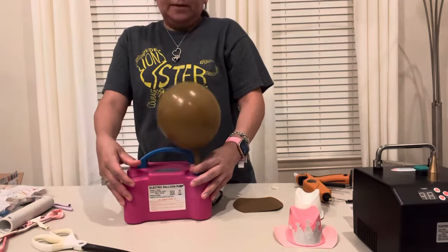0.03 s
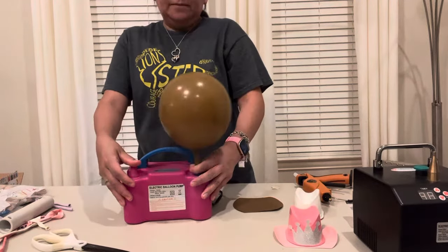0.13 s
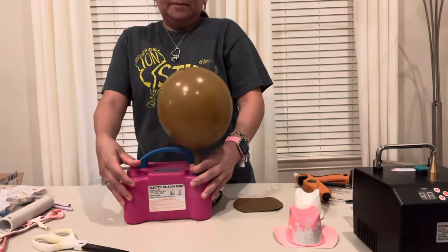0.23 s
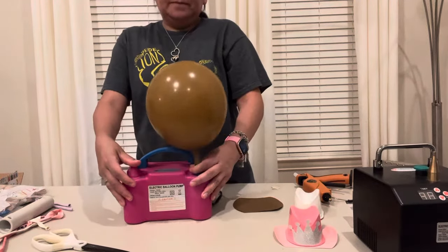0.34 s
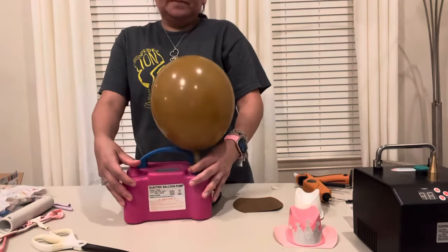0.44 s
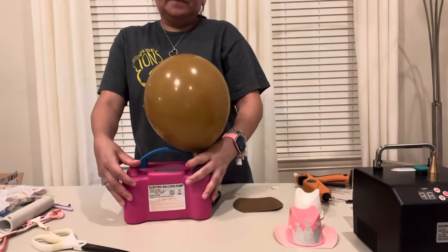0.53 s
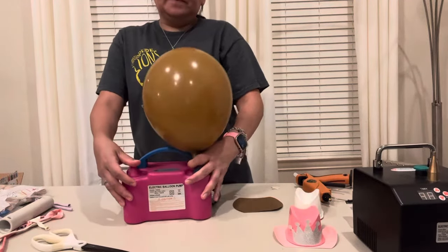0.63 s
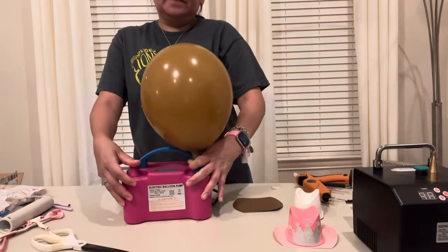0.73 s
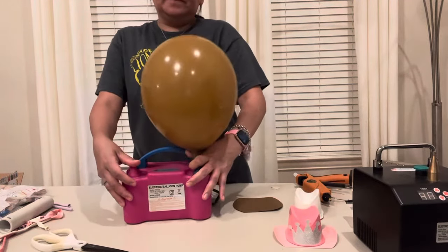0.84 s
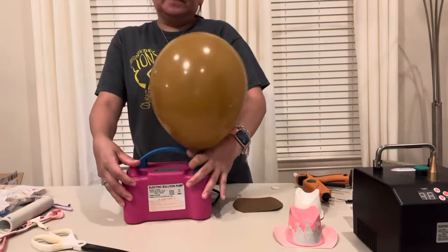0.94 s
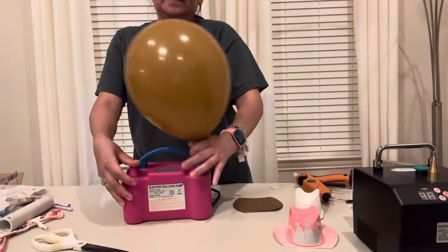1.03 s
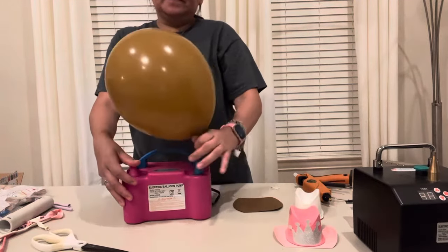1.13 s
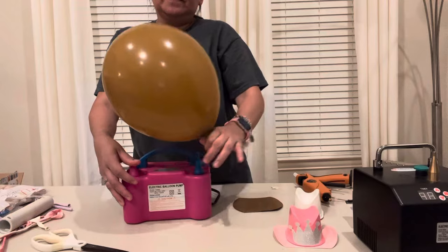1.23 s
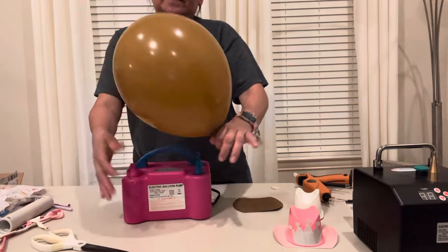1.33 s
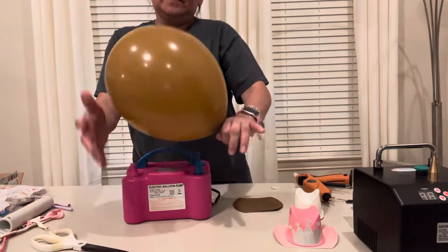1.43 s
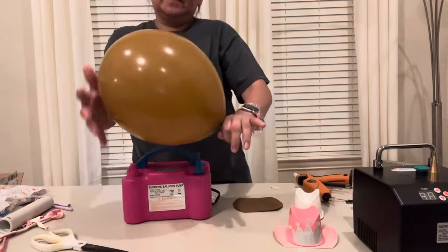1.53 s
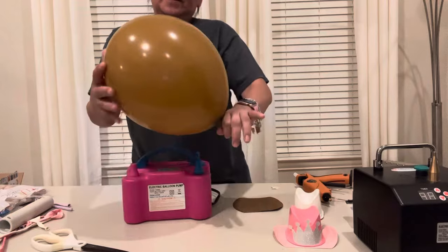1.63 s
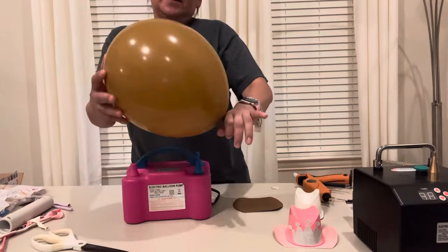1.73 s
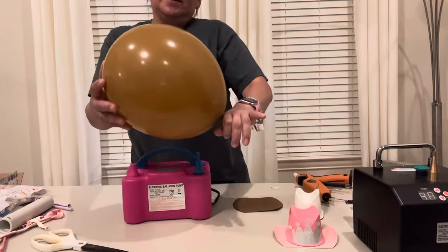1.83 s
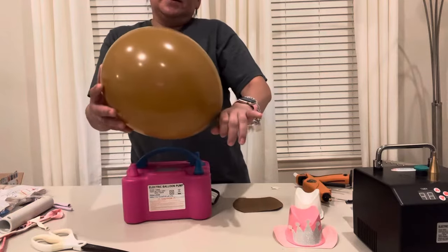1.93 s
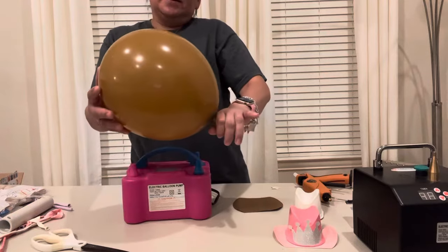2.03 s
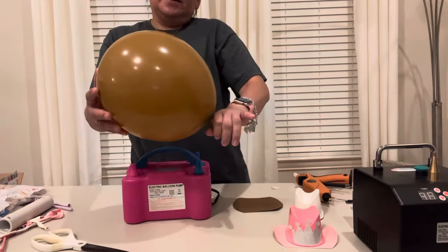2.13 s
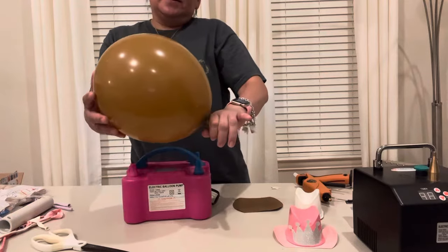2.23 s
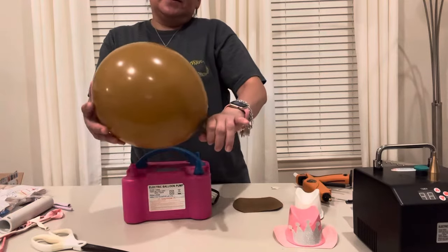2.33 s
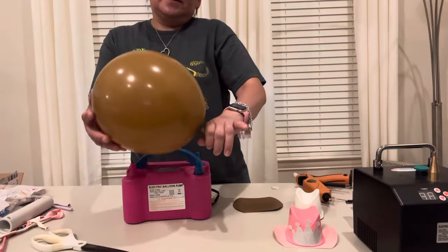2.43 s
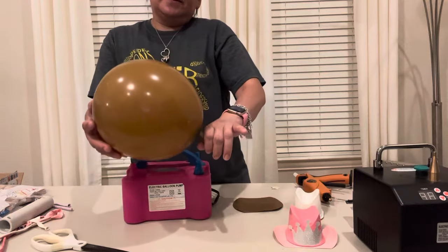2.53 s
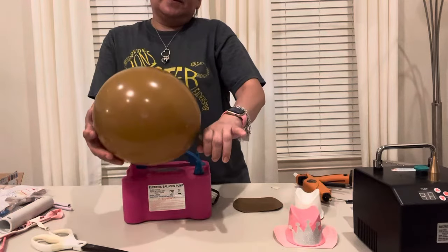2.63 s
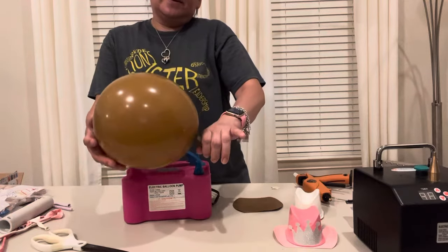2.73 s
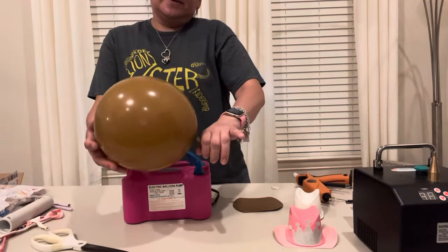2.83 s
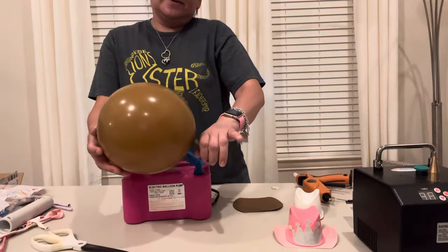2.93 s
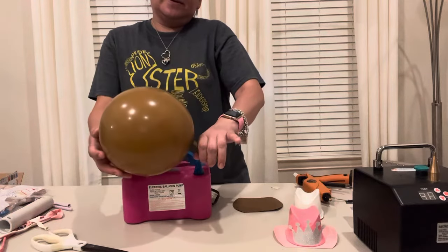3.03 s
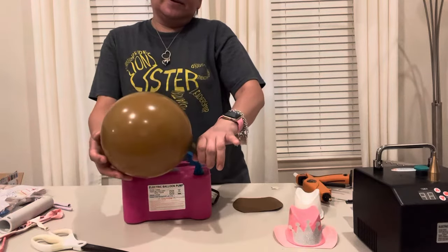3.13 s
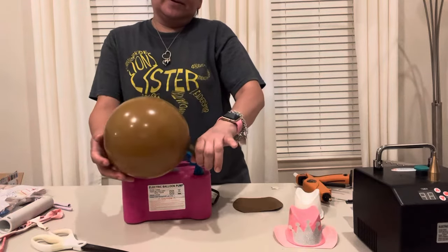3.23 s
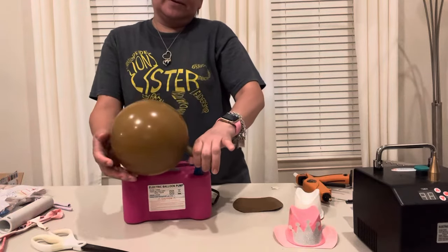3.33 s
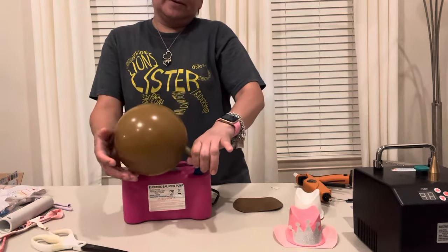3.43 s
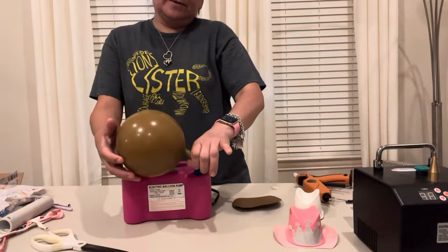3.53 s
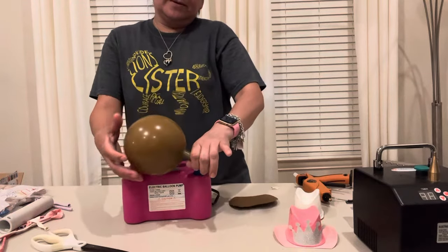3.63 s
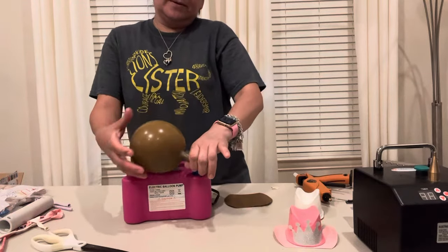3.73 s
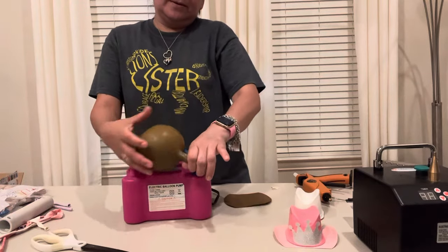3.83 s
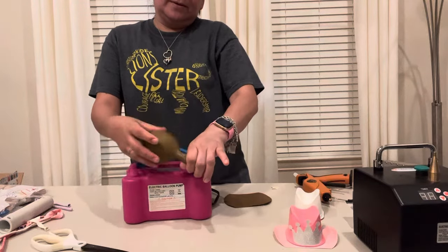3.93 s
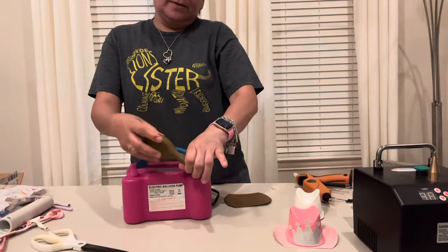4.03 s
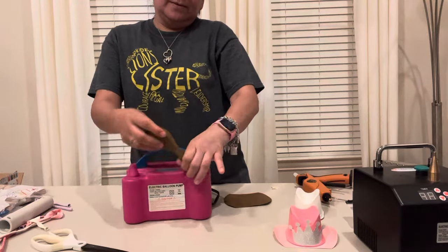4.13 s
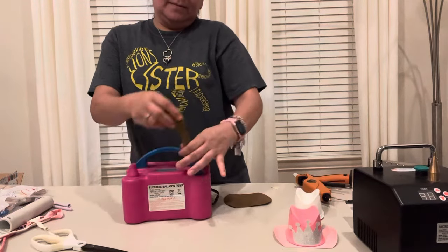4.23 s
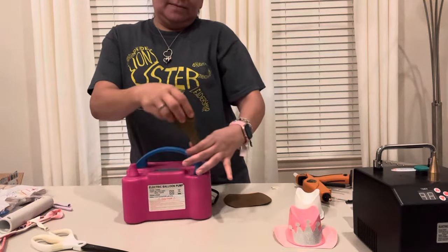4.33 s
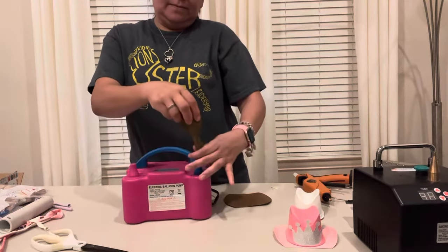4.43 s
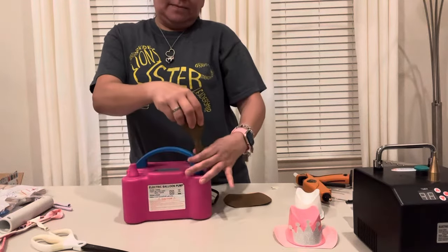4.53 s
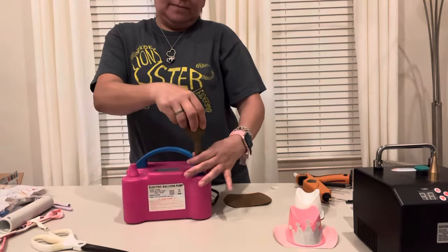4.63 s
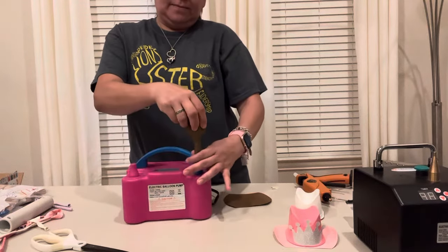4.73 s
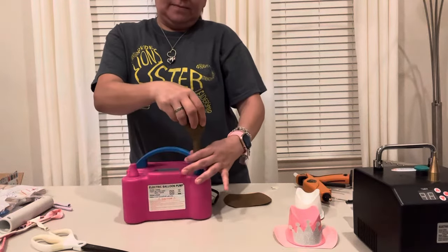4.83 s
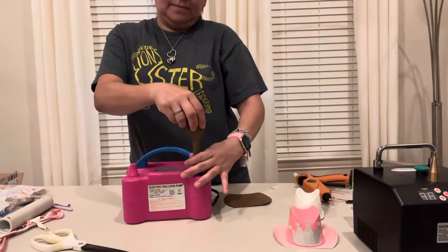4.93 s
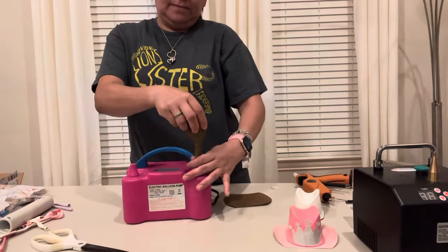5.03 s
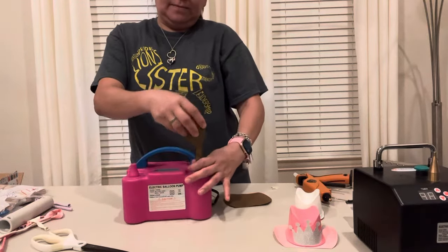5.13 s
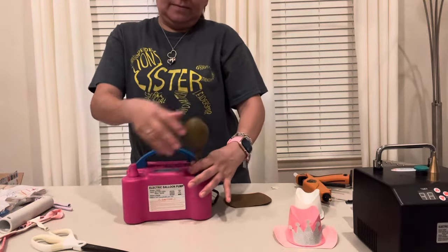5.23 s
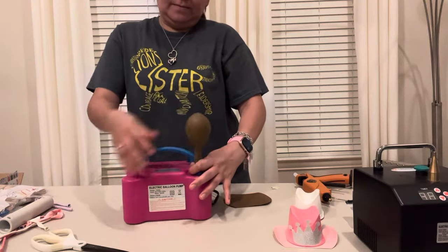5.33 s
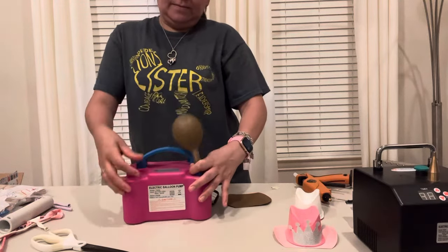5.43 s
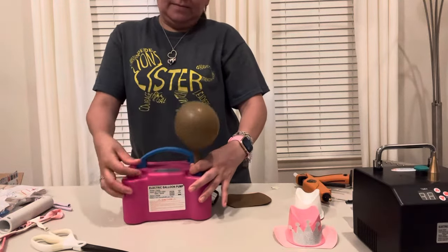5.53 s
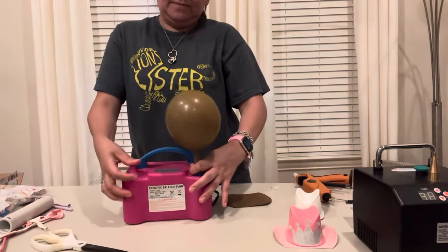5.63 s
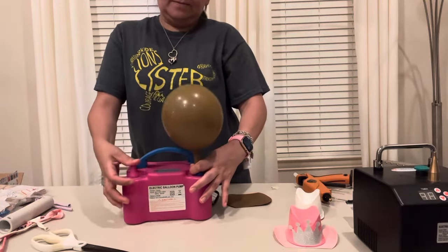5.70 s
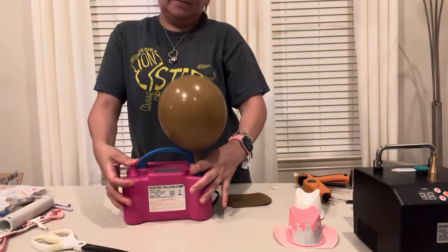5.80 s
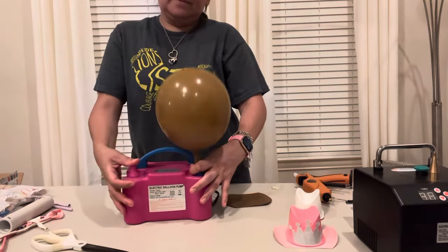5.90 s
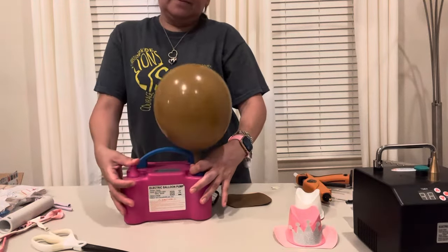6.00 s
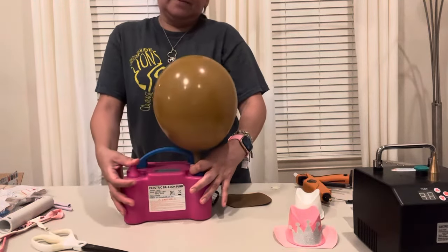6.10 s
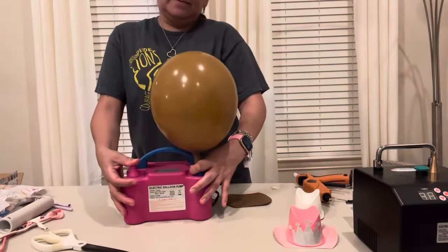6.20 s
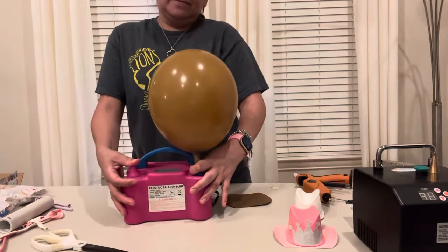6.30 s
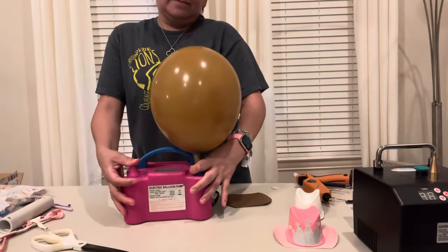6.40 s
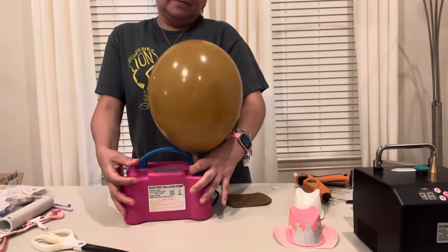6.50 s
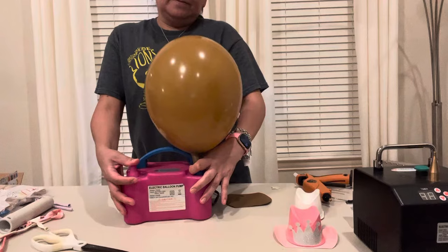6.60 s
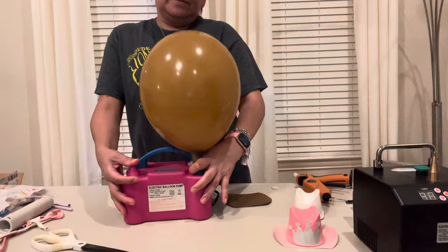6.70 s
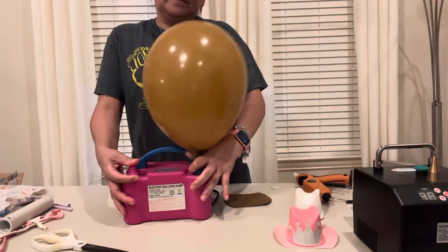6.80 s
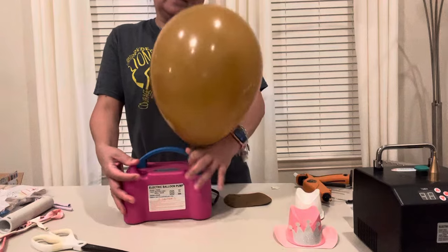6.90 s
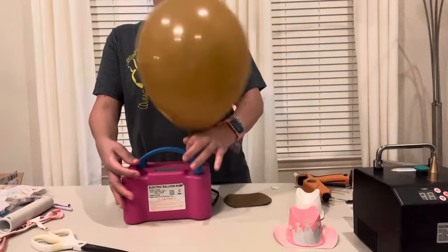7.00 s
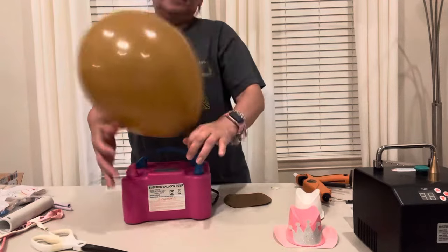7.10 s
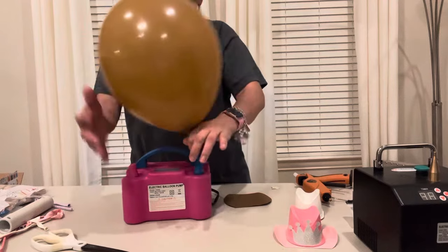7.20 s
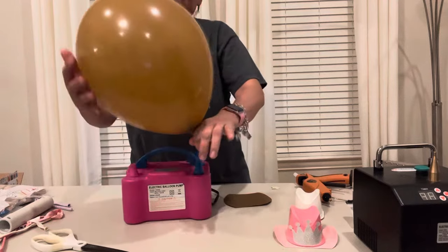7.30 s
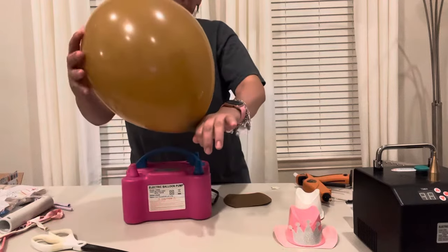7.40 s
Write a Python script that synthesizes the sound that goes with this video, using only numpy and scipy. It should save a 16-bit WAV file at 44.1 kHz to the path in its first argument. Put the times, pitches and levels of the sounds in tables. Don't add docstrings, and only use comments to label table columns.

```python
import sys
import numpy as np
from scipy import signal
from scipy.fft import rfft, irfft, next_fast_len
from scipy.io import wavfile
from scipy.ndimage import uniform_filter1d

SR = 44100
rng = np.random.default_rng(int(sys.argv[2]) if len(sys.argv) > 2 else 0)


def field_ratio(decibels):
    return 10 ** (np.asarray(decibels, dtype=float) / 20)


def transcribe(u):
    v = np.clip(np.atleast_2d(u).T, -1, 1)
    q = np.round(v * 32767).astype(np.int16)
    wavfile.write(sys.argv[1], SR, q)


N = 328839
T = np.arange(N) / SR
SIZE = next_fast_len(N + SR)
HZ = np.maximum(np.arange(SIZE // 2 + 1) * SR / SIZE, 1)

# on in seconds, off in seconds.
POWERED = [(-1, .405), (5.1546, 6.8174)]
# time in seconds, flow in dB, back pressure in dB (thickens the low part).
BLOWER_FLOW = [
    [(0, -25, 3), (.1, -22, 1), (.39, -19.5, -1), (.48, -22, 0), (.66, -28, -2), (.846, -40, 2),
     (.974, -41, 2), (.985, -30, -5)],
    [(5.172, -60, -4), (5.2, -50, -2), (5.33, -38, 1), (5.432, -25.5, -3), (5.494, -38, 4)],
    [(5.494, -38, 4), (5.6, -26, 4), (5.77, -20.5, 0), (6.1, -20.5, -2), (6.22, -24, -4), (6.42, -22, -6),
     (6.57, -25, -5), (6.84, -32, 0), (6.885, -28, -3)],
]
# frequency in Hz, sum over difference in dB.
PORTS = [(40, 21), (125, 16), (300, 11), (600, 5.5), (1500, 4.5), (4500, 3.5), (6000, -1.5), (8600, -1.5),
         (9300, -13.5), (10000, -37), (13000, -33.5), (14000, -1.5), (15800, -1.5)]
# centre in Hz, width in Hz, gain in dB.
NECK_PEAKS = [(4210, 410, 6.2), (4620, 98, 4.4), (1960, 67, 2.6), (3150, 560, 2.4)]
# centre in Hz, width in Hz, gain in dB.
MOUTH_PEAKS = [(1340, 120, 7), (1980, 300, 16)]


def rms_one(x):
    return x / np.sqrt(np.mean(x ** 2) + 1e-20)


def in_time(rows):
    s, *columns = np.transpose(rows)
    gate = np.clip(np.minimum(T - s[0], s[-1] - T) / .005 + 1, 0, 1)
    return [gate] + [np.interp(T, s, c) for c in columns]


def joined(spans):
    gate = np.max([in_time(rows)[0] for rows in spans], axis=0)
    return [gate] + in_time(sum(spans, []))[1:]


def between(start, end):
    return np.clip(np.minimum(T - start, end - T) * 1000 + .5, 0, 1)


def at_hz(points):
    hz, level_db = np.transpose(points)
    return field_ratio(np.interp(np.log(HZ), np.log(hz), level_db))


def bumps(hz, peaks):
    return sum(gain_db / (1 + (2 * (hz - centre) / width) ** 2) for centre, width, gain_db in peaks)


def drift(rate):
    knots = rng.standard_normal(4000)
    return np.interp(T * np.clip(rate, .1, 500), np.arange(4000), knots) * 1.2


def cycles(hz):
    return 2 * np.pi * np.cumsum(hz) / SR


def tone(phase, level_db):
    return np.sqrt(2) * field_ratio(level_db) * np.sin(phase)


def riding_band(hz, width_hz):
    phase = cycles(hz)
    return drift(width_hz) * np.sin(phase) + drift(width_hz) * np.cos(phase)


def air(flow, parts, colour, peaks, patchy_db):
    mid, own = rfft(rng.standard_normal((2, SIZE)))
    linked = .49
    side = -1j * linked * mid + np.sqrt(1 - linked ** 2) * own
    bounces = rms_one(rng.standard_normal(3000) * field_ratio(-T[:3000] * 600))
    echoes = np.abs(1 + .45 * rfft(bounces, SIZE) / np.sqrt(3000))
    shape = at_hz(colour) * echoes * field_ratio(bumps(HZ, peaks))
    noise = shape * np.array([mid * at_hz(PORTS), side])

    centres = np.log([350, 1000, 1800, 2800, 4400, 6500, 8500])
    shared = drift(12)
    bands = []
    for hat in np.eye(7):
        band = irfft(noise * np.interp(np.log(HZ), centres, hat), SIZE)[:, :N]
        bands.append(band * field_ratio(patchy_db * (drift(16) + .65 * shared)))

    power = np.abs(noise[0]) ** 2 * 2 / SIZE ** 2
    layers = []
    for a, b, low, high in [(0, 2, 800, 1300), (2, 4, 1500, 3500), (4, 5, 3500, 5600), (5, 7, 5600, 9000)]:
        rms = np.sqrt(np.sum(power[(HZ > low) & (HZ < high)]))
        layers.append(sum(bands[a:b]) / rms)
    rumble, body, hiss, top = layers

    gate, flow_db, pressure_db = flow
    out = field_ratio(flow_db) * hiss
    for layer, (db, follows, thickens) in zip([rumble, body, top], parts):
        out = out + field_ratio(db - 30 + follows * (flow_db + 30) + thickens * pressure_db) * layer
    return gate * out


def motion():
    pulled_off = (.99, 6.885)
    powered = sum(between(*span) for span in POWERED)
    capped = between(-1, pulled_off[0]) + between(POWERED[1][0], pulled_off[1])
    friction, capped_drag, open_drag, stall_pull = 51.19, 340.2, 546.5, 2997
    drags = open_drag + capped * (capped_drag - open_drag)
    step = 40
    speed = [660]
    for on, drag in zip(powered[::step], drags[::step]):
        now = max(speed[-1], 1)
        pull = on * stall_pull / (1 + (now / 419.1) ** 3.342)
        speed.append(now + step / SR * (pull - friction - drag * (now / 700) ** 2.123))
    return powered, capped, np.interp(np.arange(N) / step, np.arange(len(speed)), speed)


def quiet_air(speed):
    # frequency in Hz, level in dB per Hz.
    quiet_colour = [(24, -60), (40, -22), (179, -20.5), (261, -6.5), (335, -10.5), (389, -12.5), (765, -1),
                    (1540, -20), (3980, -23), (4740, -16), (15800, -27)]
    # dB over the hiss, share of the flow's swing, share of the back pressure.
    quiet_parts = [(6, 1.0, 0), (-1, 1.0, 0), (1, 1.0, 0)]
    whisper_db = -69 + 10.5 * np.log2(np.minimum(speed / 100, 1))
    return air((1, whisper_db, 0), quiet_parts, quiet_colour, NECK_PEAKS, patchy_db=.6)


def current(speed):
    # centre in Hz, width in Hz, gain in dB.
    bar_peaks = [(3740, 600, 22), (2100, 250, 9), (4700, 1300, 12), (6200, 900, 12)]
    mains = cycles(np.full(N, 121))
    on, off = POWERED[1]
    age = np.maximum(T - on - .012, 0)
    inrush = field_ratio(-27 - 60 * age / .6)
    running = field_ratio(-42 - 60 * age / 2.8)
    hum = np.minimum(age / .045, 1) ** 2 * (inrush + running)

    throb = 1 + .75 * np.cos(mains + .96)
    bars_hz = 11.8 * speed
    whine = 0
    for k, level_db in [(1, -43.5), (2, -54)]:
        whine = whine + tone(k * cycles(bars_hz), level_db + bumps(k * bars_hz, bar_peaks) - 20 * age)
    whine_gate = np.clip((age - .01) / .02, 0, 1) * np.clip((.21 - age) / .09, 0, 1)
    return between(on, off) * tone(mains, 0) * hum + whine_gate * throb * whine


def brushes(speed):
    # multiple of the speed, level in dB, loudest moment in seconds.
    brush_orders = [(45.7, -79, 4.75), (72.6, -71, 4.62), (96, -76, 4.75), (120, -79, 4.98)]
    phase = cycles(np.minimum(speed, 150) * (1 + .003 * drift(60)))
    chatter = 0
    for order, level_db, s in brush_orders:
        chatter = chatter + tone(order * phase, level_db - 130 * (T - s) ** 2 + 3.5 * drift(25))
    return between(3, POWERED[1][0]) * chatter


def unbalance(phase, powered, speed):
    # frequency in Hz, level in dB.
    casing = [(50, -68), (126, -69), (138, -45), (200, -37), (300, -44), (390, -30), (540, -28), (720, -24)]
    # centre in Hz, width in Hz, gain in dB.
    casing_peaks = [(91, 12, 14), (166, 10, -11), (250, 16, -3), (345, 24, -16), (290, 30, -4),
                    (692, 12, -6)]
    # centre in Hz, width in Hz, gain
    # in dB.
    room_nulls = [(375, 9, -11), (400, 8, -20), (472, 11, -12), (518, 14, -10), (571, 14, -16),
                  (616, 14, -14), (595, 14, 6), (540, 14, 5), (717, 16, -3.5), (352, 14, -13)]
    # centre in Hz, width in Hz, gain in dB.
    driven_peaks = [(652, 30, 12), (677, 9, 7), (606, 24, 9), (520, 180, 8), (240, 200, -14)]
    driven = uniform_filter1d(powered, size=2000)
    hz, level_db = np.transpose(casing)
    first_db = np.interp(np.log(speed), np.log(hz), level_db) + bumps(speed, casing_peaks + room_nulls)
    first_db = first_db + driven * bumps(speed, driven_peaks)
    load = driven / (1 + np.exp((675 - speed) / 15)) * field_ratio(-6 * np.clip((speed - 690) / 25, 0, 1))
    out = tone(phase, first_db + 1.5 * drift(14) + drift(30))
    # overtone, dB against the first tone when idle, dB at full load
    for order, idle_db, loaded_db in [(2, -25, -34), (3, -32, -38)]:
        level = field_ratio(first_db + idle_db) * (1 - driven) + load * field_ratio(loaded_db)
        out = out + tone(order * phase, 3 * drift(6)) * level
    return out


def blades(phase, capped, speed):
    level_db = -59 + 40 * np.log10(speed / 470) + bumps(7 * speed, [(3200, 240, 20)])
    return (1 - capped) * tone(7 * phase, level_db + 3 * drift(20))


def rotor(powered, capped, speed):
    phase = cycles(speed * (1 + .0017 * drift(40)))
    return unbalance(phase, powered, speed) + blades(phase, capped, speed) + brushes(speed)


def blower_air():
    # frequency in Hz, level in dB per Hz.
    blower_colour = [(24, -83.5), (50, -49), (595, -13), (692, -8), (765, -10), (1260, -20), (1390, -17.5),
                     (1500, -21), (2540, -17), (2880, -8.5), (3180, -12.5), (3790, -11), (6240, -12),
                     (8640, -13), (15800, -25)]
    # centre in Hz, width in Hz, gain in dB.
    blower_peaks = [(2850, 300, -9), (4234, 1200, 1.5), (1020, 240, 3), (5000, 300, -4), (3550, 300, -3),
                    (2300, 500, 3)]
    # dB over the hiss, share of the flow's swing, share of the back pressure.
    blower_parts = [(-4.5, .3, .6), (1, .8, 1.1), (-2.5, .75, .1)]
    return air(joined(BLOWER_FLOW), blower_parts, blower_colour, blower_peaks, patchy_db=1.4)


def swirl(speed):
    # time in seconds, pitch in Hz, dB against the hiss.
    mouth_ring = [
        [(0.02, 4060, -3), (0.258, 3920, -1.5), (0.318, 4310, -1.5), (0.61, 4120, -3), (0.8, 4200, -6)],
        [(5.55, 4350, -6), (5.66, 4300, -1.5), (5.76, 4000, 1.5), (5.92, 3800, -1.5), (5.99, 4300, -1.5),
         (6.14, 4200, 1.5), (6.3, 4420, -.5), (6.55, 4350, -.5), (6.85, 4400, -7)],
    ]
    gate, flow_db, pressure_db = joined(BLOWER_FLOW)
    eddies = riding_band(4.2 * speed, 400) * field_ratio(pressure_db - 4 + 2.5 * drift(10))
    eddies = eddies / (1 + np.exp((625 - speed) / 15))
    ringing, hz, under_db = joined(mouth_ring)
    ring = ringing * riding_band(hz, 420) * field_ratio(under_db + 2.5 * drift(12))
    return gate * field_ratio(flow_db) * (eddies + ring)


def nozzle_air():
    # time in seconds, flow in dB, back pressure in dB.
    nozzle_flow = [
        [(.985, -33, 0), (1.003, -17, -4), (1.079, -34, 0), (1.187, -41, 3), (1.295, -42, 0), (1.619, -47, 0),
         (1.66, -43.5, -4)],
        [(6.888, -24, 0), (6.899, -20, -4), (6.921, -21, -4), (6.928, -28, -2), (6.955, -32.5, 1),
         (7.031, -31.5, -2), (7.063, -39.5, 3), (7.363, -43.5, -2), (7.456, -45, 1)],
    ]
    # frequency in Hz, level in dB per Hz.
    nozzle_colour = [(24, -68), (40, -43), (154, -22.5), (267, -17.5), (409, -9), (539, -7), (675, -5.5),
                     (1430, -13.5), (2030, -14), (3690, -11), (8430, 0.5), (11400, 2.5), (15800, -13.5)]
    # dB over the hiss, share of the flow's swing, share of the back pressure.
    nozzle_parts = [(-9, .65, 1.4), (-4, .8, .7), (-.5, .6, .1)]
    return air(joined(nozzle_flow), nozzle_parts, nozzle_colour, NECK_PEAKS, patchy_db=1.1)


def skin():
    # start in seconds, length in seconds, pitch in Hz, level in dB.
    skin_tones = [(0.1, 0.089, 300, -32), (.33, 0.07, 365, -35), (.41, 0.1, 385, -31),
                  (5.95, .12, 440, -32.5), (6.17, .16, 470, -29), (6.55, 0.17, 522, -28),
                  (6.25, .55, 1310, -35), (1.3, .2, 155, -49)]
    out = 0
    for s, length, hz, level_db in skin_tones:
        age = np.clip((T - s) / length, 0, 1)
        phase = cycles(hz * (1 + .012 * age + .012 * drift(50)))
        out = out + np.sin(np.pi * age) * tone(phase, level_db + 3.5 * drift(40))
    return out


def puffs():
    # start in seconds, level in dB, time to fall 60 dB in seconds, centre in Hz, width in Hz.
    puff_events = [(.995, -8, .045, 4300, 900), (1.015, -19, .12, 4000, 1000),
                   (6.885, -12, .15, 4300, 3100), (6.89, -21, .18, 5800, 700), (5.39, -28, .6, 5800, 1500),
                   (6.886, -11, .012, 9000, 9000), (7.005, -40, .15, 7500, 3000),
                   (5.166, -36, .066, 780, 1300), (4.74, -65.5, .03, 9000, 5000), (3.9, -30, .2, 900, 250),
                   (3.912, -31, .3, 1300, 400), (5.149, -62, .02, 1500, 3000), (1.205, -36, .12, 3250, 120),
                   (3.9, -58, 2.5, 4720, 30), (7.1, -34, .38, 50, 26), (7.27, -32, .25, 58, 20),
                   (.81, -45, 1.34, 210, 13), (4.68, -55.5, .95, 208, 14), (1.6, -48, .3, 40, 30),
                   (5.46, -40, .2, 60, 50)]
    out = np.zeros(N)
    for s, level_db, t60, hz, width in puff_events:
        start = round(s * SR)
        r = np.exp(-np.pi * width / SR)
        ring = [1, -2 * r * np.cos(2 * np.pi * hz / SR), r * r]
        noise = signal.lfilter([1, 0, -1], ring, rng.standard_normal(SR))[SR // 2:]
        age = T[:min(SR // 2, N - start)]
        swell = np.minimum(age / (.045 * t60), 1) * field_ratio(level_db - 60 * age / t60)
        out[start:start + len(age)] += rms_one(noise)[:len(age)] * swell
    return out


def treble_burst():
    start, t60 = 6.886, .025
    treble = signal.butter(2, [9500, 15000], "band", fs=SR, output="sos")
    burst = signal.sosfilt(treble, rng.standard_normal(N))
    return burst * (T > start) * field_ratio(-14 - 60 * np.clip(T - start, 0, 10 * t60) / t60)


def neck_air():
    # time in seconds, flow in dB, back pressure in dB.
    neck_flow = [
        [(1.64, -43, 0), (1.67, -34, -6), (1.7, -35, 2), (2.17, -35, -2), (2.26, -36.5, 3), (2.58, -37, 3),
         (2.67, -39, -2), (2.82, -39, 0)],
        [(2.82, -39, 0), (3.24, -36, 3), (3.3, -38, 0), (3.6, -39.5, 0), (3.84, -34, -6), (3.93, -31, 3),
         (4.01, -53.5, 0), (4.3, -73.5, -4)],
    ]
    # frequency in Hz, level in dB per Hz.
    neck_colour = [(24, -74), (40, -66), (101, -42), (171, -26), (261, -16), (327, -16), (409, -9.5),
                   (464, -15.5), (709, -9), (1330, -14.5), (4400, -8), (6090, -4.5), (7080, -2),
                   (13900, -11.5), (15800, -42)]
    # dB over the hiss, share of the flow's swing, share of the back pressure.
    neck_parts = [(-12.5, .75, 1.6), (-6, .85, .9), (-2, .9, .3)]
    return air(joined(neck_flow), neck_parts, neck_colour, NECK_PEAKS, patchy_db=1.4)


def slaps(hz, level_db, rough, bright_db=0, mouth=MOUTH_PEAKS):
    phase = cycles(hz * (1 + .06 * rough * drift(150) + .07 * rough * drift(12)))
    levels = [level_db] + [db + bright_db + .5 * (level_db + 36) for db in (-48, -57, -61, -67)]
    out = 0
    for k, db in enumerate(levels, 1):
        shaken_db = db + bumps(k * hz, mouth) + 9 * rough * drift(70) + 5 * rough * drift(10)
        out = out + tone(k * phase, shaken_db)
    return out


def steady_flutter():
    # start in seconds, length in seconds, pitch in Hz, level in dB, roughness from 0 to 1.
    flutters = [(1.69, .23, 247, -38, .3), (2.25, .13, 353, -32, .25), (2.38, .25, 372, -35, .3),
                (2.83, .2, 405, -35.5, .24), (3.02, .29, 408, -35, .28), (3.67, .11, 345, -47, .35)]
    edges = [np.clip(np.minimum(T - s, s + length - T) / .015, 0, 1) for s, length, *rest in flutters]
    latest = np.maximum(np.searchsorted([row[0] for row in flutters], T) - 1, 0)
    hz, level_db, rough = np.array(flutters)[latest, 2:].T
    return sum(edges) * slaps(hz, level_db, rough)


def squeal():
    # time in seconds, pitch in Hz, level in dB.
    squeal_glide = [
        [(1.9, 335, -38), (1.925, 370, -42), (1.95, 430, -28), (1.98, 445, -38), (2.0, 520, -48),
         (2.03, 660, -48), (2.05, 668, -52), (2.085, 660, -46), (2.14, 560, -46)],
        [(2.14, 560, -46), (2.19, 445, -40), (2.23, 400, -36), (2.26, 361, -38)],
    ]
    gate, hz, level_db = joined(squeal_glide)
    return gate * slaps(hz, level_db, rough=.42, bright_db=3.5)


def last_flap():
    # time in seconds, pitch in Hz, level in dB.
    flap_glide = [(3.898, 480, -44), (3.908, 455, -38), (3.93, 410, -41), (3.98, 387, -43),
                  (4.03, 384, -51), (4.12, 384, -67)]
    gate, hz, level_db = in_time(flap_glide)
    return gate * slaps(hz, level_db, rough=.55, bright_db=1.5, mouth=[(1980, 900, -12)])


def room(x):
    t60, tail_db = .3, -12
    tail = rng.standard_normal((2, SR)) * field_ratio(-60 * T[:SR] / t60) * (T[:SR] > .004)
    tail = rfft(tail / np.sqrt(np.sum(tail ** 2, axis=1, keepdims=True)), SIZE)
    ports = at_hz(PORTS)
    share = np.array([ports, -1j * np.ones_like(HZ)]) / np.sqrt(1 + ports ** 2)
    return irfft(rfft(x, SIZE) * share * (1 + field_ratio(tail_db) * tail), SIZE)[:, :N]


def scene():
    powered, capped, speed = motion()
    flows = quiet_air(speed) + blower_air() + nozzle_air() + neck_air()
    pump = current(speed) + rotor(powered, capped, speed) + swirl(speed)
    balloon = skin() + puffs() + steady_flutter() + squeal() + last_flap()
    mid, side = flows + room(pump + balloon)
    mid = mid + treble_burst()
    return np.array([mid + side, mid - side])


def top_cut(x):
    return signal.sosfilt(signal.butter(12, 15900, fs=SR, output="sos"), x)


def record(dry):
    rounded = 1.081 * np.tanh(dry / 1.05)
    return top_cut(rounded)


dry = scene()
out = record(dry)
transcribe(out)
```